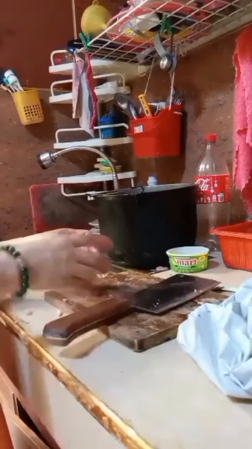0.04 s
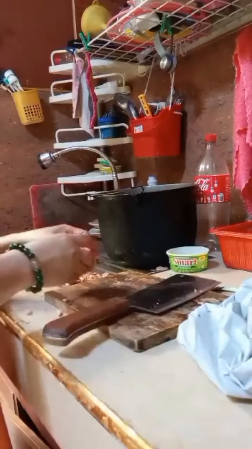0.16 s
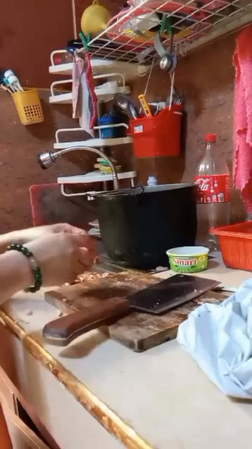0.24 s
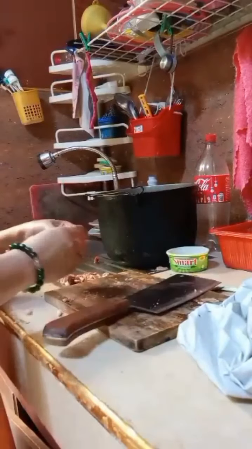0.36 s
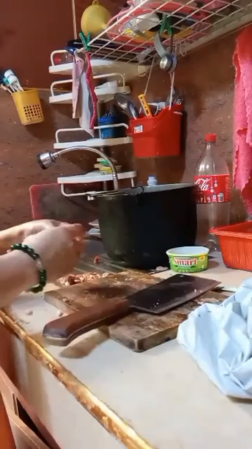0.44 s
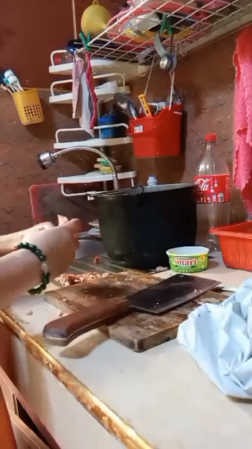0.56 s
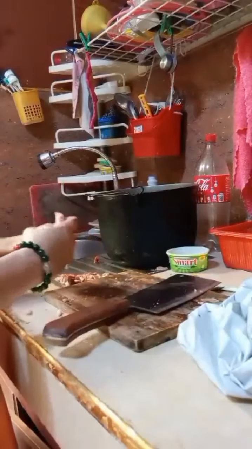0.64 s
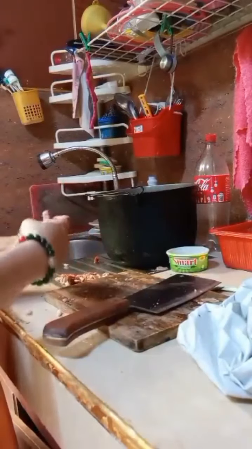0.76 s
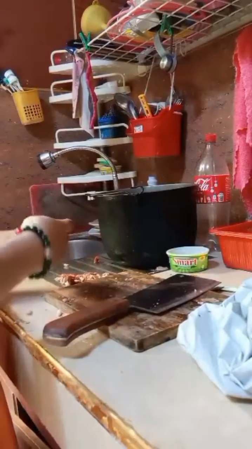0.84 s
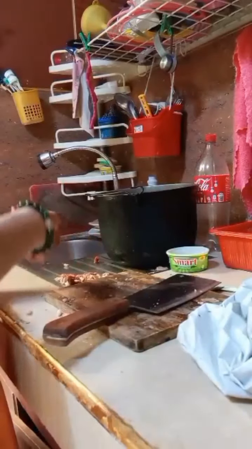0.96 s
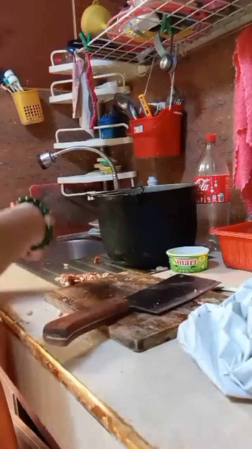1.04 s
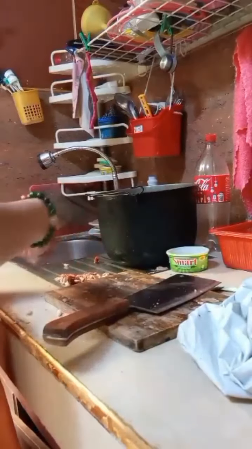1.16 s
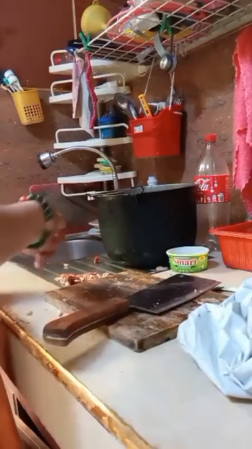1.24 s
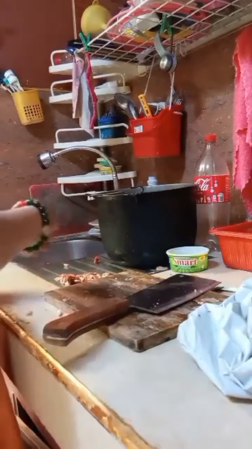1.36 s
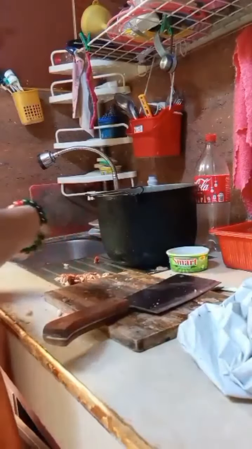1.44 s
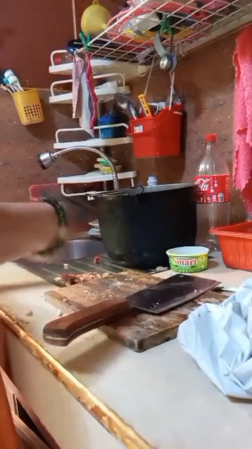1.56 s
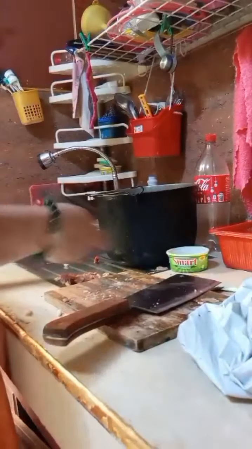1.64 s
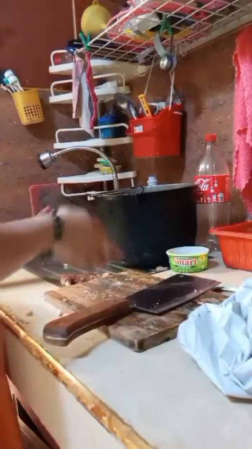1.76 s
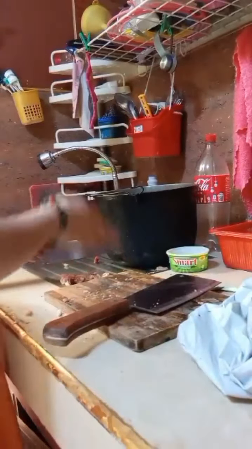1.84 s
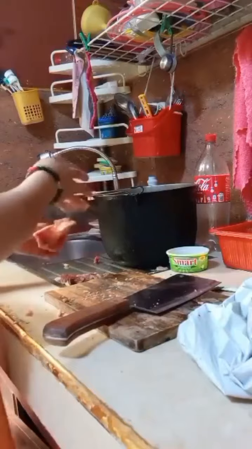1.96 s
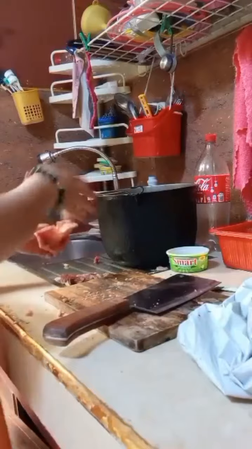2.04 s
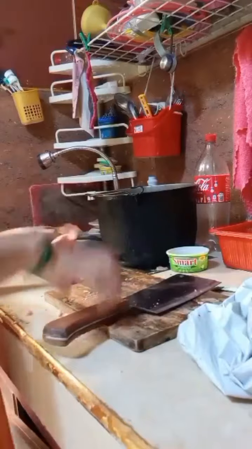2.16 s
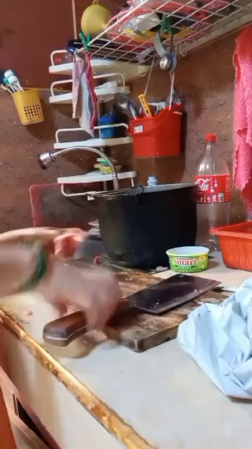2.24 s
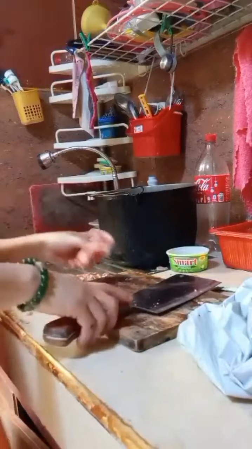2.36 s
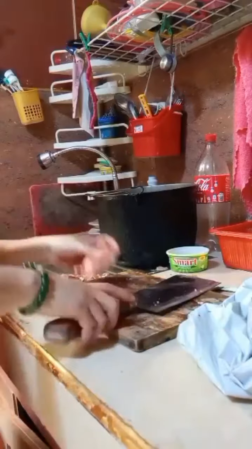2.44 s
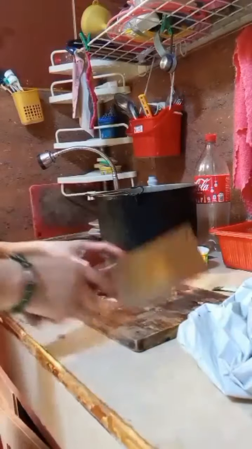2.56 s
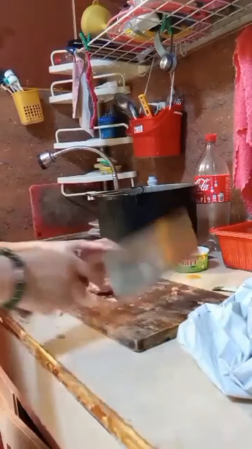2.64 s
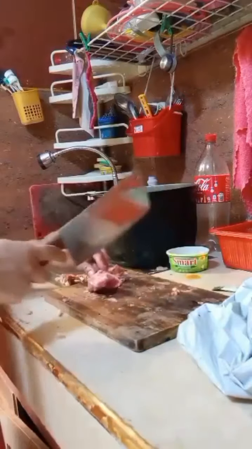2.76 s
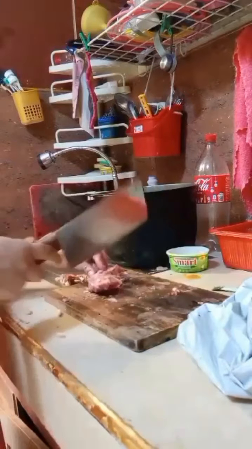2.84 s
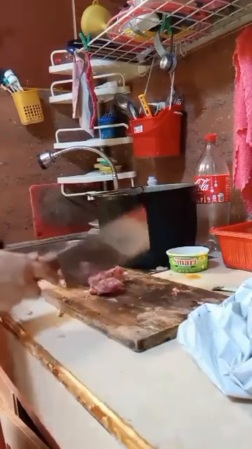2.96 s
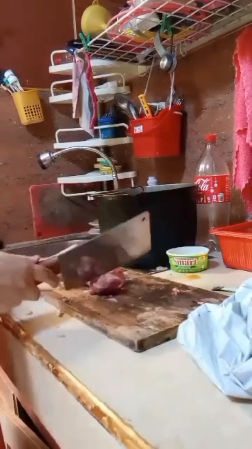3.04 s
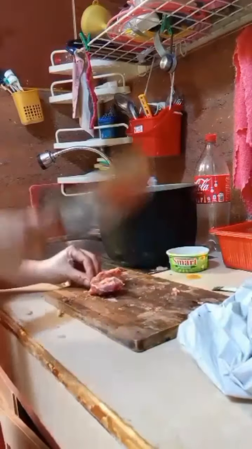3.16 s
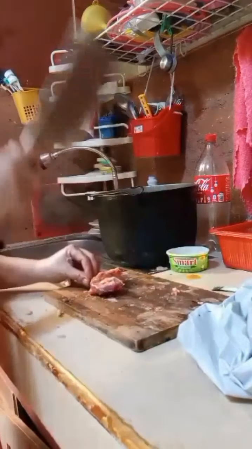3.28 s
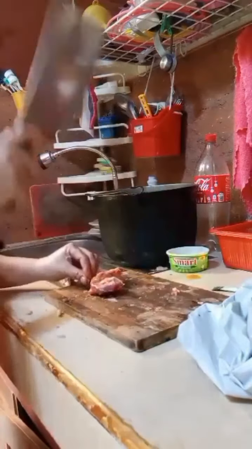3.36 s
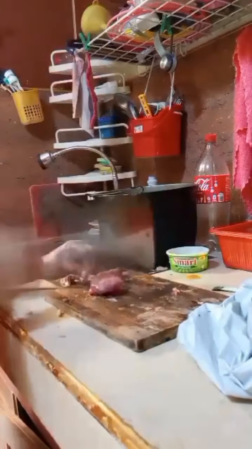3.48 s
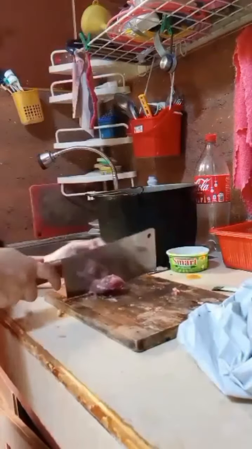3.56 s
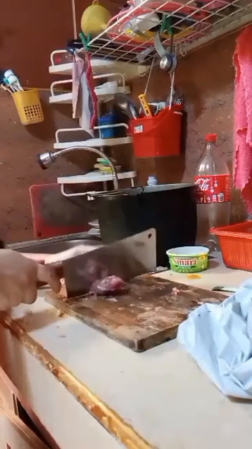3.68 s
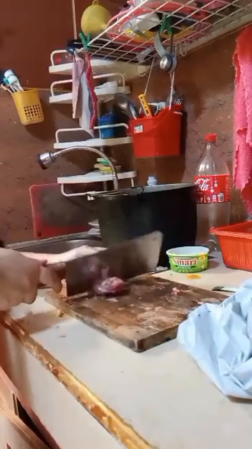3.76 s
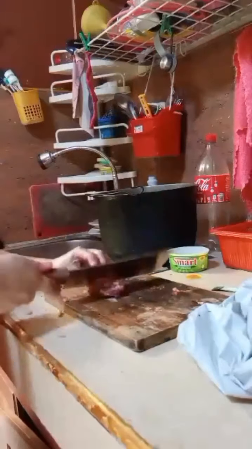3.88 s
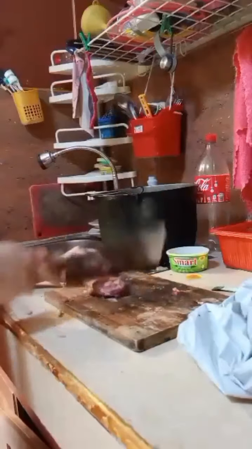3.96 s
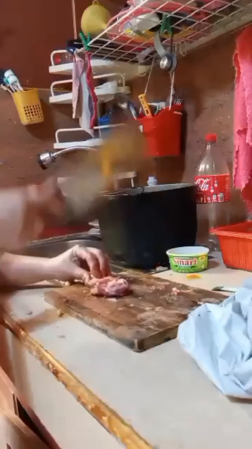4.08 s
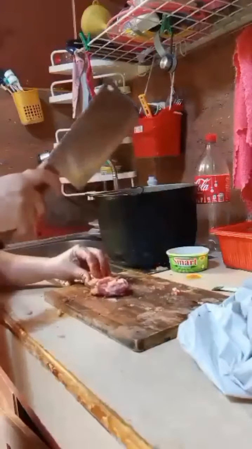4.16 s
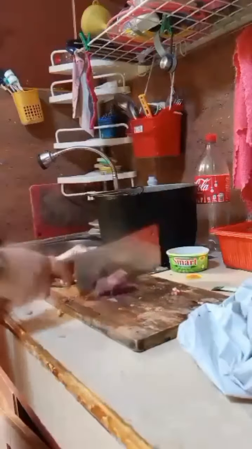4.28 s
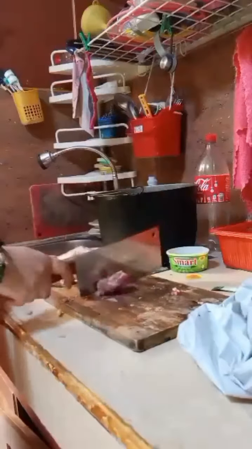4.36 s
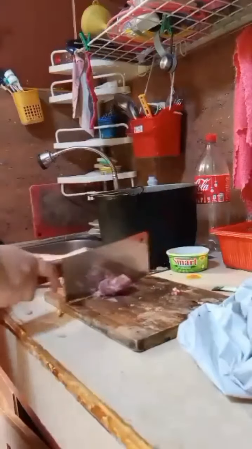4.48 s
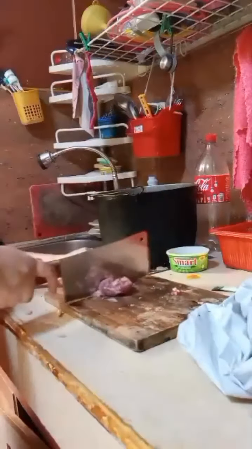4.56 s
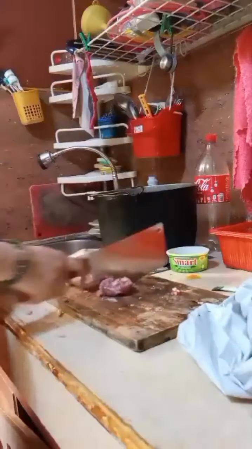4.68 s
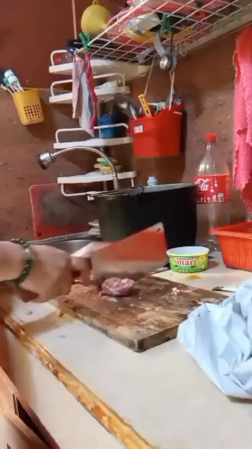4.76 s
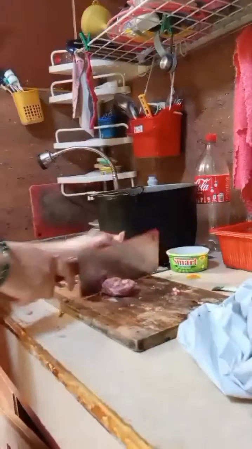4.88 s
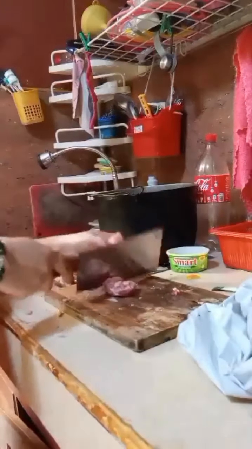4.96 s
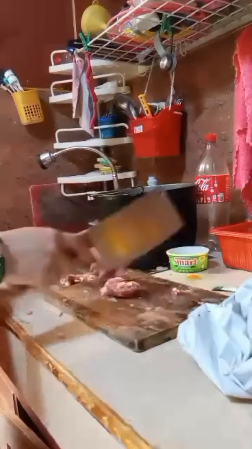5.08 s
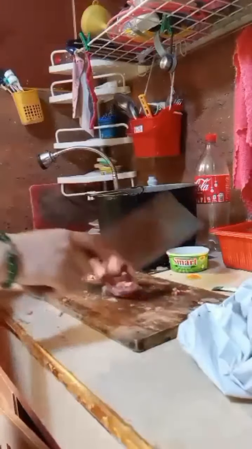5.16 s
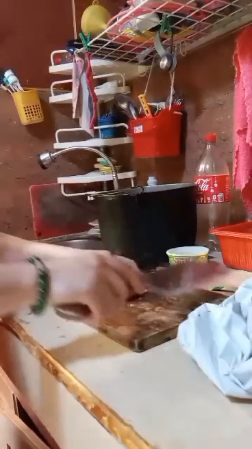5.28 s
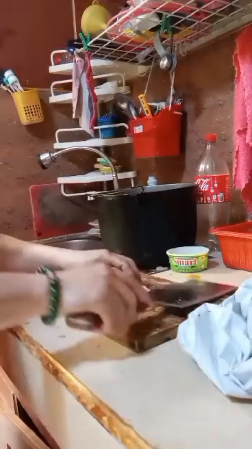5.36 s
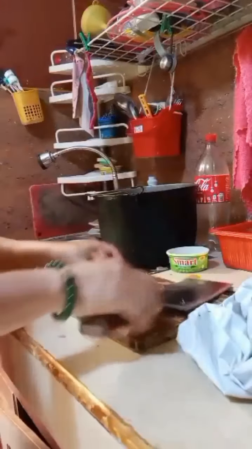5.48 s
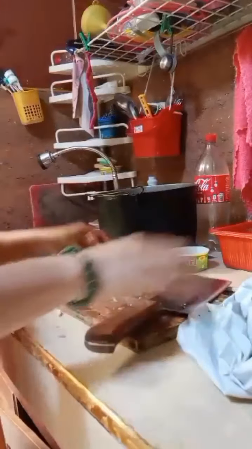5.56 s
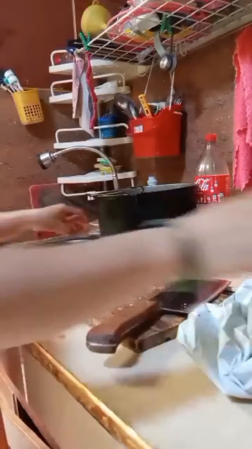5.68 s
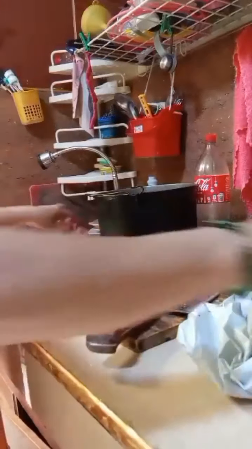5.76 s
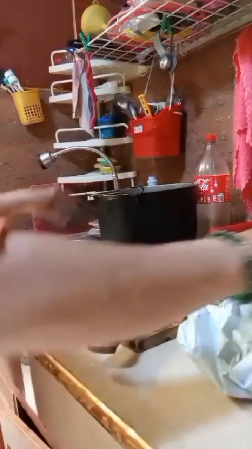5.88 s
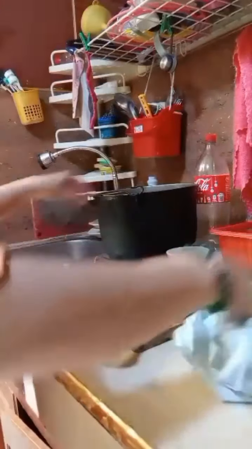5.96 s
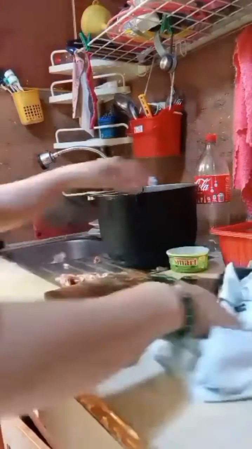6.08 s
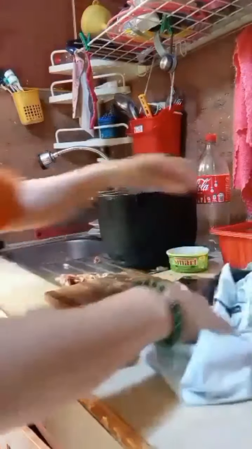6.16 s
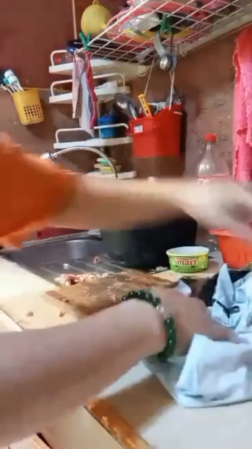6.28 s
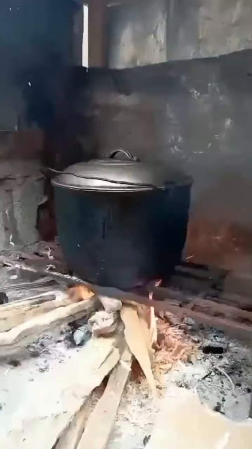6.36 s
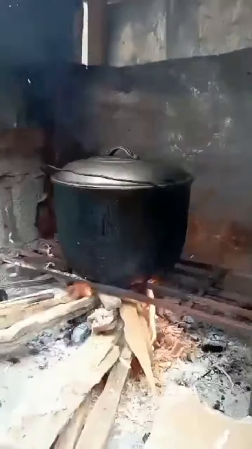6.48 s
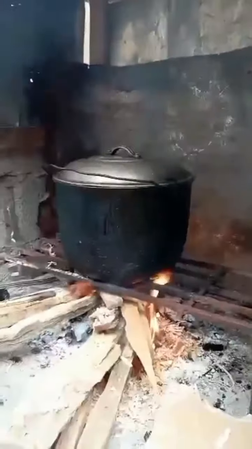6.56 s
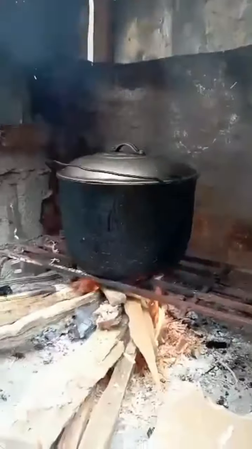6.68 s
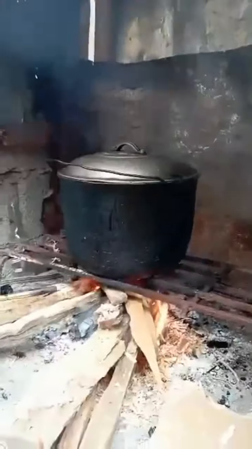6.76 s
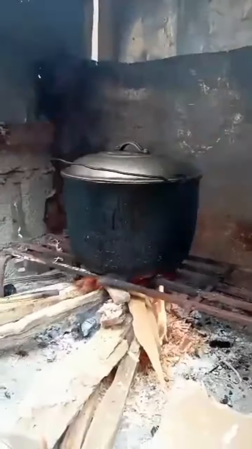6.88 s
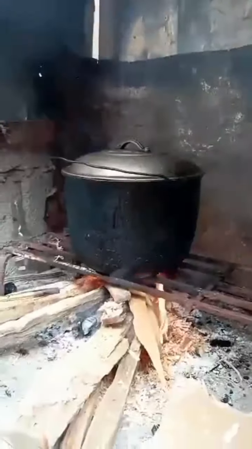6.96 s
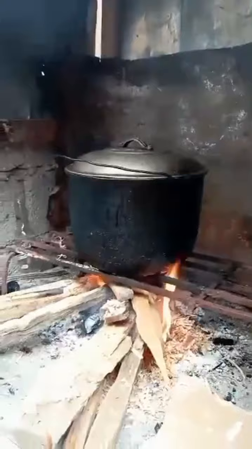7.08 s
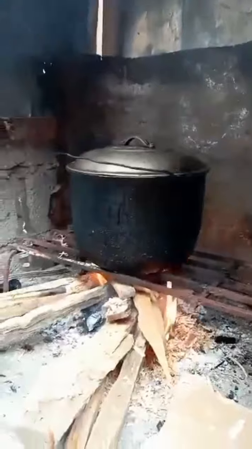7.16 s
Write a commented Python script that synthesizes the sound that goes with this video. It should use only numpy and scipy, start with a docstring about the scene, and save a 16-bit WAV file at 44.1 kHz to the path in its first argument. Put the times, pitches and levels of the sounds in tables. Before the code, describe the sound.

Close microphone on a kitchen counter: quiet hand movements, a light metallic clink as the cleaver is lifted, then separate hard chops with woody knocks and ringing. Wet, uneven rubbing follows, far faint hoots sound behind, and a busy flurry of cloth rustle and small ticks ends the scene. A brief gap, then steady breathy flame roar with hiss under a pot outdoors or by a hearth.

```python
"""A cleaver chops meat on a wooden board in a small hard kitchen: noise bursts, ringing modes and a room tail.
Blade clinks and small ticks ring from short knocks; wet handling is a rub of uneven noise grains.
Behind lie a low wavering rumble, thin room air, far hoots and faint blips, from filtered noise and sines.
After a brief silence comes a second place: a wood fire under a pot, coloured noise that rushes and fades in."""
import sys
import numpy as np
from scipy import signal
from scipy.fft import rfft, irfft, next_fast_len
from scipy.io import wavfile
from scipy.ndimage import uniform_filter1d

SR = 44100
rng = np.random.default_rng(int(sys.argv[2]) if len(sys.argv) > 2 else 0)


def master_out(mix):
    """Clip the mix to full scale and print it as 16-bit PCM to the path in sys.argv[1]."""
    frames = np.transpose(np.atleast_2d(mix))
    ceiling = np.clip(frames, -1, 1)
    pcm = np.round(ceiling * 32767).astype(np.int16)
    wavfile.write(sys.argv[1], SR, pcm)


def invert_db(level):
    """Linear amplitude ratio for a level in decibels (20 dB per decade), elementwise."""
    return 10 ** (np.asarray(level, dtype=float) / 20)


N = 318402
TIME = np.arange(N) / SR
AIRY_HZ = 7800   # where the airy top of the handling begins

# modes of the board and the held blade: f/Hz, relative level/dB, t60/s
BOARD_MODES = [(135, 1, .5), (253, -3, .3), (355, 0, .18), (441, -5, .4), (479, 2, .19), (620, 0, .25),
               (738, 1, .4), (1012, 0, .25), (1180, -3, .2), (1373, -3, .2), (3490, -8, .25),
               (4285, -9, .25), (5875, -7, .18), (6560, -6, .2)]
# colour of the wet handling and of the bright part of the blows: f/Hz, relative level/dB
WET_COLOUR = [(410, -33), (700, -7.5), (754, -6), (853, -11), (1310, -5), (1480, -8.5), (3110, -6.5),
              (4330, -10), (6510, -6.5), (7930, -24.5), (9900, -5), (13300, -37)]


def rms_one(x):
    """Scale to rms 1."""
    return x / np.sqrt(np.mean(x ** 2) + 1e-30)


def in_time(rows):
    """A curve of (time, value) rows read at every sample."""
    s, values = np.transpose(rows)
    return np.interp(TIME, s, values)


def at_hz(points, hz):
    """A spectrum read on a log frequency axis."""
    f, v = np.transpose(points)
    return np.interp(np.log(hz), np.log(f), v)


def drift(rate):
    """Slow chance of spread 1: noise low-passed near rate in Hz, drawn every 40 samples."""
    r = np.exp(-80 * np.pi * rate / SR)
    slow = signal.lfilter([1], [1, -2 * r, r * r], rng.standard_normal(N // 40 + 2002))[2000:]
    return np.interp(np.arange(N) / 40, np.arange(len(slow)), rms_one(slow))


def clicks(times, gains):
    """An impulse at each time."""
    out = np.full(N, 1e-18)
    np.add.at(out, np.round(np.asarray(times) * SR).astype(int), gains)
    return out


def ring(x, hz, t60):
    """A unit click sets a decaying sine of starting height 1 ringing."""
    r, w = invert_db(-60 / (t60 * SR)), 2 * np.pi * hz / SR
    return signal.lfilter([0, np.sin(w)], [1, -2 * r * np.cos(w), r * r], x)


def die(x, t60):
    """Envelope that jumps at each click and decays by 60 dB in t60 seconds."""
    return signal.lfilter([1], [1, -invert_db(-60 / (t60 * SR))], x)


def build_up(x, t60):
    """Softens the start of an envelope: a one-pole smoother with gain 1 for steady input."""
    return die(x, t60) * (1 - invert_db(-60 / (t60 * SR)))


def resonance(x, hz, width):
    """Two-pole resonance, width in Hz, gain 1 at its top."""
    r = np.exp(-np.pi * width / SR)
    top = np.array([1, 0, -1]) * (1 - r * r) / 2
    return signal.lfilter(top, [1, -2 * r * np.cos(2 * np.pi * hz / SR), r * r], x)


def bank(source):
    """Third-octave bands with their centres; neighbours come from unrelated draws."""
    edges = 40 * 2 ** (np.arange(27) / 3)
    for k, (low, high) in enumerate(zip(edges, edges[1:])):
        band_pass = signal.butter(2, [low, high], "band", fs=SR, output="sos")
        yield np.sqrt(low * high), signal.sosfilt(band_pass, source[k % 2])


def coloured(source, spectrum, split_hz, patchy_db):
    """Coloured noise whose bands flicker apart, returned as a low and a high part of rms 1."""
    low, high = 0, 0
    for hz, band in bank(source):
        part = band * invert_db(at_hz(spectrum, hz) + patchy_db * drift(8))
        if hz < split_hz:
            low = low + part
        else:
            high = high + part
    return rms_one(low), rms_one(high)


def cluttered(source, peaks_db):
    """Pots, racks and walls add many peaks and dips some 60 Hz wide; two patterns trade places by chance."""
    size = next_fast_len(N)
    bumps = uniform_filter1d(rng.standard_normal((2, 1, size // 2 + 1)), size=round(60 * size / SR))
    bumps = uniform_filter1d(bumps, size=round(40 * size / SR))
    gains = invert_db(peaks_db * np.clip(rms_one(bumps), -2, 2))
    one, other = irfft(rfft(source, size) * gains, size)[..., :N]
    share = .5 + .5 * np.tanh(2 * drift(4))
    return share * one + (1 - share) * other


def swell(s, hold, db, rise_db, fall_db):
    """Gain of an event that rises, holds from s on and falls, at steady dB per second."""
    return invert_db(db - rise_db * np.maximum(s - TIME, 0) - fall_db * np.maximum(TIME - s - hold, 0))


def blows():
    """Blows crack or thump and ring the board, two ring the free blade; a room tail dies band by band."""
    # blows on the board: t/s, then relative level/dB of crack, counter thud, board knock, edge clack
    blow_rows = [(0.0163, -36, -43, -45, -46), (0.0442, -30, -46, -47, -34),
                 (3.5828, -8, -27.5, -32.5, -26.5), (4.3784, -26.5, -49, -24, -20.5),
                 (4.3852, -10, -23.5, -29.5, -53), (4.4383, -42, -70, -24.5, -30),
                 (4.4512, -24.5, -31.5, -47.5, -53), (5.4509, -20, -57.5, -43.5, -35),
                 (5.463, -7, -43, -36, -25.5), (5.6334, -40.5, -38.5, -42.5, -37.5),
                 (5.9512, -64, -31, -14.5, -40), (5.9836, -35, -32.5, -69, -41)]
    # where thud, knock, clack, crack and the top of the crack are strongest: f/Hz
    weight_hz = (130, 400, 1000, 4000, 8000)
    # blows that leave the blade free to ring: t/s, relative level/dB
    free_rings = [(0.0443, -50), (5.463, -36)]
    # modes of the blade lying free: f/Hz, relative level/dB, t60/s
    free_modes = [(2132, 7, .55), (2460, -7, .25), (2906, -9, .3), (3478, -11, .65), (7951, -22, .3),
                  (9830, -10, .28)]
    # decay of the kitchen: f/Hz, t60/s
    room_decay = [(80, 0.27), (560, 0.52), (1470, 0.49), (3880, 0.52), (7000, 0.49), (11000, 0.38)]

    s, crack, thud, knock, clack = np.transpose(blow_rows)
    free_s, blade = np.transpose(free_rings)
    flat = np.abs(s[:, None] - free_s).min(axis=1) < .03
    # the blade laid down flat sends 4.5 dB less treble into the room than its edge
    parts = list(zip(thud, knock, clack, crack - 14, crack - 14 - 4.5 * flat))

    def weight(hz):
        """Strength of every blow at one frequency, in dB."""
        return np.array([np.interp(np.log(hz), np.log(weight_hz), row) for row in parts])

    # the edge snaps on the wood just after first contact
    snap = resonance(resonance(clicks(s + .0013, invert_db(crack + 16.5)), 6300, 1500), 5800, 2500)
    out = signal.sosfilt(signal.butter(6, 7200, fs=SR, output="sos"), snap)
    # the wood answers with a short pop
    out = out + resonance(clicks(s + .0012, invert_db(crack + 17)), 1000, 500)

    for hz, band in bank(cluttered(rng.standard_normal((2, N)), peaks_db=2.0)):
        colour = -3.0
        if hz > 1800:
            colour = at_hz(WET_COLOUR, hz) + 4 - 1.4 * (AIRY_HZ < hz < 11000)
        strike = clicks(s, invert_db(weight(hz) + colour))
        # the room fills quickly, lows later
        tail = build_up(die(strike, at_hz(room_decay, hz)), 3.3 / hz + 0.0069)
        # each early band needs a cycle or so to build up
        early = build_up(die(strike, 1.7 / hz + 0.021), 5.7 / hz)
        out = out + rms_one(band) * (invert_db(-11.0) * tail + invert_db(-6.5) * early)

    luck = rng.normal(0, 1, (len(s), len(BOARD_MODES)))
    for k, (hz, db, t60) in enumerate(BOARD_MODES):
        strike = clicks(s, invert_db(weight(hz) + db - 12.0 + 4.26 * luck[:, k]))
        # low modes swell over a few cycles
        out = out + ring(resonance(strike, hz, .25 * hz), hz, t60)
    for hz, db, t60 in free_modes:
        strike = clicks(free_s, invert_db(blade + db))
        # a twin 5.5 Hz lower, 3 dB stronger and shorter-lived, beats with the mode
        twin = invert_db(3) * ring(strike, hz - 5.5, t60 / 2)
        brief = ring(strike, hz * 1.01, t60 / 4) / 2
        out = out + ring(strike, hz, t60) + twin + brief
    return signal.sosfilt(signal.butter(6, 100, "high", fs=SR, output="sos"), out)


def clinks():
    """Touching the lifted blade makes it chatter and clink; chance shakes each mode in its own uneven way."""
    # touches on the lifted blade: t/s, relative level/dB, chatter/s
    touches = [(2.636, -54, .025), (5.0991, -62.5, .012)]
    # modes of the lifted blade: f/Hz, relative level/dB, t60/s
    lifted_modes = [(1280, -6, .35), (2030, -7, .1), (2702, -8, .12), (3138, -9, .2), (3494, -5, .35),
                    (4070, -11, .2), (5303, -3, .2), (6260, -3, .22), (6950, -5, .2), (7954, -15, .28),
                    (9832, -9, .18), (10750, -11, .2)]
    s, db, length = np.transpose(touches)
    starts, sizes = np.round(s * SR).astype(int), np.round(length * SR).astype(int)
    out = np.zeros(N)
    for hz, level_db, t60 in lifted_modes:
        shake = np.full(N, 1e-18)
        for at, gain, size in zip(starts, invert_db(db + level_db), sizes):
            shake[at:at + size] += gain * rng.standard_normal(size) / np.sqrt(size)
        out += ring(shake, hz, t60)
        # close neighbours roughen each mode
        out += ring(shake, hz * 1.012, t60 / 2) + ring(shake, hz * .991, t60 / 2)
    return out


def ticks():
    """Bone, bead and blade tick: a noisy snap around a pitch, a short ring and a little room behind."""
    # small ticks: t/s, relative level/dB, f/Hz
    tick_rows = [(0.4209, -24.5, 5260), (0.7993, -35.5, 2220), (1.0194, -35, 6100), (1.5638, -28, 6900),
                 (2.553, -35.5, 5300), (2.5688, -30, 6200), (2.767, -45, 5960), (2.85, -47.5, 4670),
                 (2.9266, -43.5, 5000), (2.971, -42.5, 5100), (3.0809, -25.5, 5820), (3.1593, -31.5, 5450),
                 (3.8994, -30, 6300), (3.914, -35.5, 5800), (5.0992, -35.5, 4740), (5.287, -41, 1260),
                 (5.3627, -44.5, 5020), (5.896, -36, 4263), (5.9262, -38, 6068), (5.9587, -28, 4720),
                 (5.9793, -24, 5900), (6.0125, -28, 5050), (6.1625, -23, 5600), (6.177, -30, 6450),
                 (6.11, -22, 6050), (6.2881, -29, 6100), (6.305, -35, 5360), (6.325, -31, 5400),
                 (6.333, -38, 6600)]
    out, noise = np.zeros(N), rng.standard_normal(SR // 4)
    t = np.arange(SR // 4) / SR
    snap_and_room = invert_db(-60 * t / 0.005) + invert_db(-15.0 - 60 * t / 0.18)
    shape = snap_and_room * np.minimum(t / 0.00064, 1)
    for k, (s, db, hz) in enumerate(tick_rows):
        raw = np.roll(noise, 411 * k)   # each tick starts elsewhere in the noise
        pitched = rms_one(resonance(resonance(raw, hz, 0.5 * hz), hz, 0.3 * hz))
        tone = pitched + 0.57 * rms_one(resonance(raw, 4200, 11000))
        sines = np.sin(2 * np.pi * hz * t) + 0.4 * np.sin(2 * np.pi * hz * .54 * t)
        chime = invert_db(-6.5 - 60 * t / 0.031) * sines
        at = round(s * SR)
        out[at:at + len(t)] += invert_db(db - 14.5) * (shape * tone + chime)
    return out


def rubbing():
    """Wet flesh and cloth stick and slip in dense uneven grains that stir upper modes of board and blade."""
    # strokes of hands, wet meat and cloth: t/s, hold/s, bright level/dB,
    # dull part re bright level/dB, airy top re bright level/dB
    stroke_rows = [(0.31, 0.075, -78.5, -12, -3), (0.445, 0.0082, -61.5, -21, -3.5),
                   (0.535, 0.44, -78, -6, 0.5), (1.015, 0.066, -64, -19, -2),
                   (1.559, 0.0065, -65.5, -18, 8), (2.578, 0.023, -63, 1, -8),
                   (2.641, 0.0095, -59, 3.5, -17), (2.96, 0.059, -75, -6, -12),
                   (3.096, 0.0065, -62.5, -3, -24), (3.756, 0.18, -61.5, -7.5, -13),
                   (4.632, 0.077, -61, -3, -13), (4.731, 0.036, -51.5, -4.5, -15),
                   (4.908, 0.044, -57.5, -5, -13.5), (5.263, 0.2, -78.5, 3.5, -12),
                   (5.93, 0.055, -54.5, -2, -9.5), (6.024, .11, -45.5, 0.5, -11.5),
                   (6.192, 0.054, -59.5, -0.5, -5.5), (6.292, 0.083, -63.5, 3.5, -19)]
    rise_db_per_s, fall_db_per_s, rest_db = 650, 163, -96
    strokes = [swell(s, hold, db, rise_db_per_s, fall_db_per_s) for s, hold, db, *_ in stroke_rows]
    *_, dull_db, airy_db = np.transpose(stroke_rows)
    bright_gain = invert_db(rest_db) + sum(strokes)
    dull_gain = invert_db(rest_db) + sum(gain * invert_db(db) for gain, db in zip(strokes, dull_db))
    airy_gain = sum(gain * invert_db(db) for gain, db in zip(strokes, airy_db))

    white = rng.standard_normal((2, N))
    uneven_db = 2.8 * np.minimum(rng.exponential(1, (2, N)), 4.5) + drift(60)
    grains = white * invert_db(uneven_db) * (rng.random((2, N)) < .15)   # 15 % of samples carry a grain
    stirred = sum(resonance(grains, hz, .05 * hz) for hz, db, t60 in BOARD_MODES if hz > 1100)
    grains = cluttered(grains + .5 * stirred, peaks_db=3.0)
    dull, bright = coloured(grains, WET_COLOUR, 2500, patchy_db=1.8)
    body = rms_one(signal.sosfilt(signal.butter(4, AIRY_HZ, "low", fs=SR, output="sos"), bright))
    airy = rms_one(signal.sosfilt(signal.butter(4, AIRY_HZ, "high", fs=SR, output="sos"), bright))
    return bright_gain * body + dull_gain * dull + airy_gain * airy


def fire():
    """Turbulent flame roar and hiss, coloured by the hollows of pot and hearth; sap steams out and whistles."""
    # level of the fire: t/s, level/dB
    fire_level = [(6.41, -64), (6.46, -59), (6.475, -44.5), (6.58, -38.5), (6.7, -34.5), (7.22, -36)]
    # f/Hz, relative level/dB
    fire_colour = [(24, -57), (40, -26.5), (199, -2.5), (465, -8), (703, -11), (775, -9.5), (1120, -7),
                   (1610, -11), (4140, -12.5), (4680, -22.5), (7610, -21.5), (9700, -20.5), (13300, -77)]
    # hollows of pot and hearth: f/Hz, width/Hz
    hollow_modes = [(468, 230), (1100, 50), (4280, 110), (6370, 240), (7600, 70)]
    # sap steaming out of the wood: f/Hz, width/Hz
    sap_whistles = [(4150, 490), (7600, 300)]
    white = rng.standard_normal((2, N))
    hollows = 0
    for hz, width in hollow_modes:
        flicker_db = (3.0 if hz > 2000 else 0) * drift(5.5)
        hollows = hollows + resonance(white, hz, width) * 2.24 * invert_db(flicker_db)
    roar, hiss = coloured(cluttered(white + hollows, peaks_db=2.5), fire_colour, 1500, patchy_db=1.3)
    sap = 0
    for hz, width in sap_whistles:
        whistle = rms_one(resonance(resonance(white[1], hz, width), hz, width))
        sap = sap + whistle * invert_db(2.0 * drift(6.6))
    # the whistles rise at 50 dB/s to full strength at 7.17 s
    roar = roar + swell(7.17, 1, -10, 50, 1) * sap
    return invert_db(in_time(fire_level)) * (roar + invert_db(-3) * hiss)


def rumble():
    """A wavering hum near two low pitches over lumpy sub-bass, with a faint unsteady overtone: narrow noise."""
    # hum: t/s, level/dB
    hum_level = [(0.0, -57.5), (0.44, -67.5), (0.89, -67.5), (1.17, -71), (1.52, -65), (2.04, -67.5),
                 (2.27, -54.5), (2.5, -66.5), (3.42, -70), (3.75, -62), (4.22, -80), (4.54, -53.5),
                 (4.72, -68.5), (6.37, -76)]
    # sub-bass swells: t/s, hold/s, level/dB
    sub_swells = [(.6, 0.37, -68), (2.25, 0.34, -66), (4.548, 0.43, -69), (6.05, 0.018, -63)]
    rise_db_per_s, fall_db_per_s, rest_db = 85, 72.5, -91
    sub_gain = invert_db(rest_db) + sum(swell(*row, rise_db_per_s, fall_db_per_s) for row in sub_swells)
    white = rng.standard_normal((4, N))
    hum = rms_one(resonance(resonance(white[0], 120, 9.2), 110, 35))
    hum = hum + 0.75 * rms_one(resonance(resonance(white[1], 100, 55), 130, 53))
    sub = rms_one(resonance(resonance(white[2], 41, 42), 53, 61))
    overtone = rms_one(resonance(resonance(white[3], 360, 12), 360, 9.7))
    overtone = invert_db(-86 + 3.1 * drift(3)) * overtone
    return invert_db(in_time(hum_level)) * rms_one(hum) + sub_gain * sub + overtone


def room_air():
    """Thin, patchy coloured noise fills the kitchen."""
    # f/Hz, relative level/dB
    air_colour = [(110, -37), (180, -15), (303, 2), (357, -9), (412, -1), (894, -7.5), (1330, -8.5),
                  (5410, -19.5), (13300, -37)]
    low, high = coloured(rng.standard_normal((2, N)), air_colour, 1500, patchy_db=5.5)
    return invert_db(-81.5) * low + invert_db(-86) * high


def far_hoots():
    """Soft wavering far hoots: gliding near-sines with two weak overtones."""
    # t/s, length/s, start f/Hz, glide/(Hz/s), level/dB
    hoot_rows = [(3.852, 0.19, 439, 130, -59.5), (4.033, .17, 458.4, 145, -57),
                 (4.207, 0.17, 496, 115, -62.5), (6.158, 0.35, 439, -22, -55)]
    out = np.zeros(N)
    for s, length, start_hz, glide, db in hoot_rows:
        hz = start_hz + glide * np.clip(TIME - s, 0, length)
        phase = 2 * np.pi * np.cumsum(hz * (1 + 0.0092 * drift(25))) / SR
        fade = np.clip(np.minimum(TIME - s, s + length - TIME) / 0.026, 0, 1)
        gain = np.sqrt(2) * fade * invert_db(db + 2.5 * drift(14))
        second = invert_db(-21 + 4 * drift(10)) * np.sin(2 * phase)
        third = invert_db(-35 + 5 * drift(10)) * np.sin(3 * phase)
        out += gain * (np.sin(phase) + second + third)
    return out


def faint_blips():
    """Faint short tones, scuffs and soft low bumps: narrow noise under a rounded window."""
    # t/s, length/s, f/Hz, level before the window/dB, width/Hz
    blip_rows = [(0.232, 0.19, 142, -60, 27), (0.872, 0.21, 109.6, -56.5, 21), (2.254, 0.08, 71.4, -48, 60),
                 (2.857, 0.061, 106.5, -56, 24), (2.949, 0.072, 112, -56.5, 21),
                 (0.581, 0.18, 1021, -65.5, 84), (0.98, 0.068, 1740, -64, 110), (1.955, 0.12, 726, -67, 20),
                 (2.496, 0.065, 4070, -77, 140), (2.219, 0.2, 620, -69.5, 78),
                 (2.076, .12, 740.7, -73, 230), (2.258, 0.098, 3380, -74, 1400), (2.45, .11, 560, -82, 26),
                 (4.714, 0.095, 1220, -57.5, 250), (4.916, 0.067, 1230, -62, 220),
                 (5.405, 0.079, 1259, -63, 120)]
    out, white = np.zeros(N), rng.standard_normal(N)
    for s, length, hz, db, width in blip_rows:
        at, size = round(s * SR), round(length * SR)
        raw = white[at:at + size + SR // 8]   # extra length lets the filter settle
        narrow = resonance(resonance(raw, hz, width), hz, width)[-size:]
        out[at:at + size] += invert_db(db) * rms_one(narrow) * np.hanning(size) ** .5
    return out


def scene():
    """The kitchen, a brief silence, then the fire, alike in both channels."""
    # silence between the two places: start t/s, end t/s
    gap_start, gap_end = (6.367, 6.405)
    kitchen = blows() + clinks() + ticks() + rubbing() + rumble() + room_air() + far_hoots() + faint_blips()
    before = np.clip((gap_start - TIME) / 0.00045, 0, 1)
    after = np.clip((TIME - gap_end) / 0.044, 0, 1)
    mid = before * kitchen + after * fire()
    return np.array([mid, mid])


def band_limit(x):
    """A steep low-pass at the top of the band."""
    return signal.sosfilt(signal.butter(12, 13690, fs=SR, output="sos"), x)


def record(dry):
    """The two channels agree below about 3 kHz and differ unsteadily above; the top is cut at 13.7 kHz."""
    high_pass = signal.cheby2(12, 70, 3400, "high", fs=SR, output="sos")
    side = invert_db(-6.5) * signal.sosfilt(high_pass, dry[0] * drift(150))
    both = dry + side * [[1], [-1]]
    mix = signal.sosfilt(signal.cheby2(12, 60, 13700, fs=SR, output="sos"), both)
    return band_limit(mix)


dry = scene()
out = record(dry)
master_out(out)
```